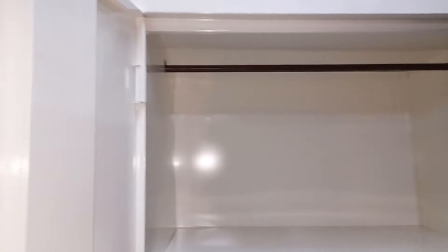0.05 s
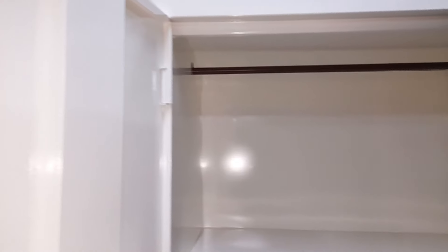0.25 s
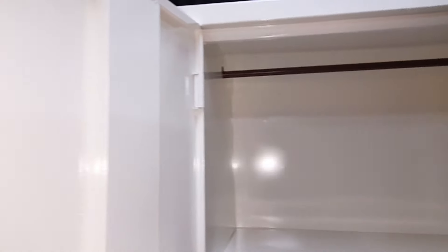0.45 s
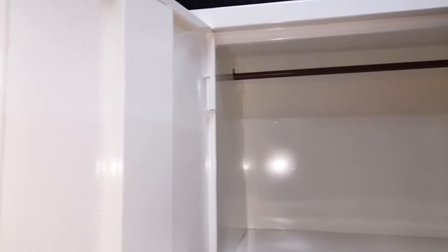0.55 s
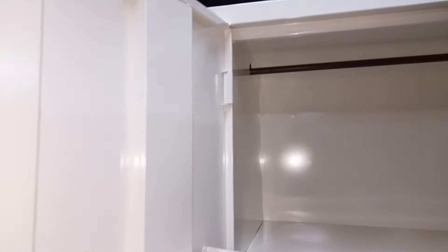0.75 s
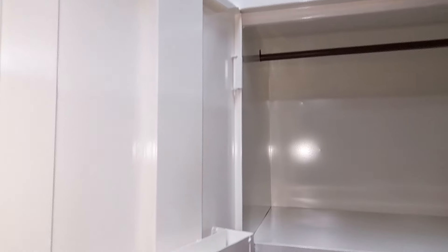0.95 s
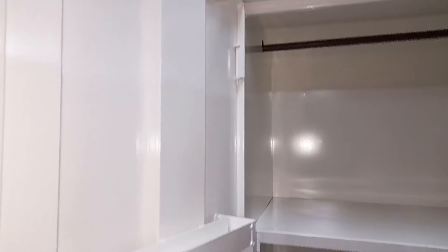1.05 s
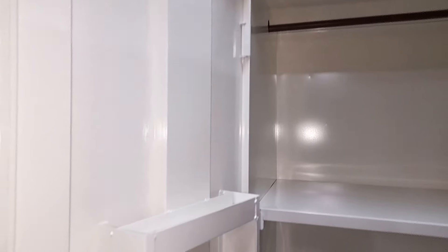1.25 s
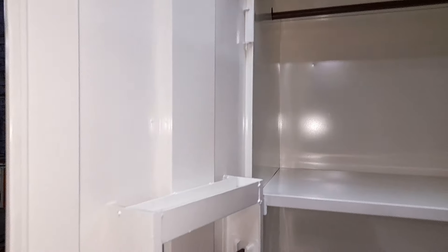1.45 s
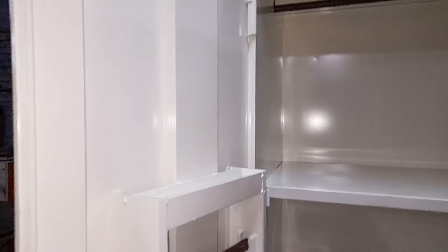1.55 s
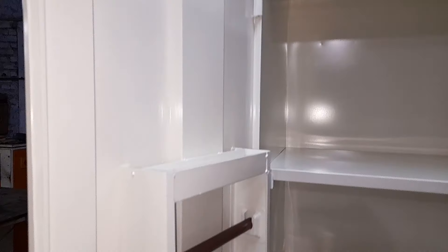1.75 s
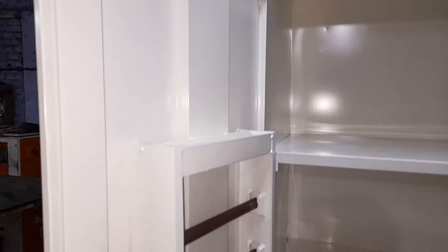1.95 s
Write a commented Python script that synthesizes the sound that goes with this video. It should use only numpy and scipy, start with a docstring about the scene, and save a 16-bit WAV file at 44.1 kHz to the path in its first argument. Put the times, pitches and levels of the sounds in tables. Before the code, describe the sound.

A steel wardrobe door knocks and clacks several times in a hard, echoing room.

```python
"""The door of a sheet-steel wardrobe knocks lightly, then clacks home, several times in a hard room.
Each impact excites the steel's dense modes and the door's strong ones, and reverberation prolongs them.
The large panels boom on between the blows, and a thud passes through the floor. An edge slides briefly
after the first clack, and the last clack sets a small steel part ringing."""
import sys
import numpy as np
from scipy import signal
from scipy.fft import rfft, irfft
from scipy.io import wavfile

SR = 44100
rng = np.random.default_rng(int(sys.argv[2]) if len(sys.argv) > 2 else 0)


def generate_wav(signal):
    """Clip the signal to [-1, 1] and save it as 16-bit WAV at the path in sys.argv[1]."""
    frames = np.transpose(np.atleast_2d(signal))
    scaled = np.clip(frames, -1, 1) * 32767
    pcm = np.round(scaled).astype(np.int16)
    wavfile.write(sys.argv[1], SR, pcm)


N = 88200

# Likeness of the two channels. Each row: frequency in Hz, correlation (limited to 1 in use).
CORRELATION = [(100, 1.1), (250, 0.77), (500, 0.83), (1000, -0.04), (2000, -0.08), (5000, 0)]


def amp(db):
    """Amplitude ratio of a level in decibels."""
    return 10 ** (np.asarray(db) / 20)


def curve_at(points, hz):
    """A curve's value at hz, interpolated on a logarithmic frequency axis."""
    f, value = np.transpose(points)
    return np.interp(np.log(hz + 1), np.log(f + 1), value)


def add(mix, start_s, sound):
    """Superposition: a sound adds to the mix from start_s on."""
    at = round(start_s * SR)
    sound = sound[:, max(-at, 0):]
    part = mix[:, max(at, 0):][:, :sound.shape[1]]
    part += sound[:, :part.shape[1]]


def noise(colour, size, shade_db=0):
    """Partial coherence: coloured stereo noise of unit level, then shaded; alike only in the bass."""
    hz = np.fft.rfftfreq(size, 1 / SR)
    a, b, c, d = rng.standard_normal((4, len(hz)))
    correlation = np.clip(curve_at(CORRELATION, hz), -1, 1)
    gain = amp(curve_at(colour, hz))
    mid = (a + 1j * b) * np.sqrt(1 + correlation)
    side = (c + 1j * d) * np.sqrt(1 - correlation)
    spectrum = np.array([mid + side, mid - side]) * gain * amp(shade_db)
    return irfft(spectrum, size) * np.sqrt(size / np.mean(gain ** 2)) / 2


def ring(modes, rise_s, size, scatter=0):
    """Free vibration: damped modes build up and decay, each with its own phase between the channels."""
    t, out = np.arange(size) / SR, np.zeros((2, size))
    for hz, db, t60 in modes:
        correlation = np.clip(curve_at(CORRELATION, hz), -1, 1)
        apart = np.arccos(correlation) * rng.choice([-1, 1]) / 2
        phase = 2 * np.pi * scatter * rng.random() + np.array([[apart], [-apart]])
        out += amp(db) * np.exp(-np.log(1000) * t / t60) * np.sin(2 * np.pi * hz * t + phase)
    return out * (1 - np.exp(-t / rise_s))


def room_air(start_db=-51, rise_db=8, rise_s=0.21):
    """Ambient noise: a low rumble and hiss, which grow as the moving door adds faint rubbing."""
    # Noise spectrum. Each row: frequency in Hz, relative density in dB.
    spectrum = [(20, -22), (100, 11), (250, -4.5), (500, -7), (1000, -15), (3000, -26.5), (4800, -28.5),
                (5800, -17), (7000, -34), (14000, -30)]
    growth = np.minimum(np.arange(N) / SR / rise_s, 1)
    return amp(start_db + rise_db * growth) * noise(spectrum, N)


def sliding_edge(peak_db=-42.5, start_s=0.35, peak_s=0.42, end_s=1):
    """Sliding friction: a painted edge rubs along the steel with a hiss that swells and fades."""
    # Friction spectrum. Each row: frequency in Hz, relative density in dB.
    spectrum = [(100, -15), (700, 7), (2000, 2), (5500, -2.5), (9000, -6), (13000, -1.5), (16000, -4.5)]
    swell = np.interp(np.arange(N) / SR, [start_s, peak_s, end_s], [0, 1, 0])
    return amp(peak_db) * swell * noise(spectrum, N)


def steel_part():
    """Modal ringing: a small, stiff part has high natural frequencies, so it pings thinly when struck."""
    # Its modes. Each row: frequency in Hz, relative level in dB, T60 in seconds.
    modes = [(11820, -10, .28), (12745, 0, .25), (13610, -4, .38), (14250, -13, .3), (14560, -6, .55),
             (15075, -14, .28), (15510, -7, .48)]
    # Blows on it. Each row: start in seconds, gain in dB.
    hits = [(1.129, -59), (1.53, -25.5)]
    out = np.zeros((2, N))
    ping = ring(modes, rise_s=0.00064, size=SR, scatter=1)
    for start_s, db in hits:
        add(out, start_s, amp(db) * ping)
    return out


def panels(thud_hz=53.6, thud_peak_s=0.03):
    """Flexural vibration: shoves set the large panels booming, while footsteps send low thuds through the
    floor."""
    # Bending modes. Each row: frequency in Hz, relative level in dB, T60 in seconds.
    modes = [(62.5, -13, 3.7), (80.2, -5.5, 1.1), (98.2, -7, 0.89), (104.77, 2.5, 1.37), (120.9, 1, 1.17),
             (134.7, -9.5, 1.4), (173.7, -14, 1.1)]
    # Heavy shoves and footfalls. Each row: start in seconds, boom gain in dB, thud gain in dB.
    shoves = [(-.12, -43.5, -65), (.225, -55, -54), (.295, -36, -33.5), (0.426, -34.5, -38),
              (0.604, -27, -48.5), (0.673, -26, -36), (.87, -32.5, -49.5), (1.099, -33.5, -36),
              (1.241, -36.5, -49), (1.39, -39, -43), (1.536, -26, -52), (1.60, -33, -35), (1.681, -40, -43),
              (1.80, -34, -50)]
    out, t = np.zeros((2, N)), np.arange(N) / SR
    boom = ring(modes, rise_s=0.015, size=N).mean(axis=0, keepdims=True)
    pulse = (t / thud_peak_s * np.exp(1 - t / thud_peak_s)) ** 2
    thud = pulse * np.sin(2 * np.pi * thud_hz * t)
    for start_s, boom_db, thud_db in shoves:
        add(out, start_s, amp(boom_db) * boom + amp(thud_db) * thud)
    return out


def door_bumps():
    """Damped resonance: a light bump before a clack excites only a few modes, a short hollow note."""
    # Modes of the note. Each row: frequency in Hz, relative level in dB, T60 in seconds.
    modes = [(685.7, 0.5, 0.39), (740, 2, 0.14), (825, -40, 0.098)]
    # Light contacts. Each row: start in seconds, gain in dB.
    bumps = [(.183, -33.5), (.204, -25), (.572, -25), (1.112, -33), (1.482, -27)]
    out = np.zeros((2, N))
    note = ring(modes, rise_s=0.0027, size=SR)
    for start_s, db in bumps:
        add(out, start_s, amp(db) * note)
    return out


def impact_decay(size, frame, hold_s=0.014, crack_s=0.0029):
    """Damping and reverberation: steel and room decays add in power, a gain by frequency and time."""
    # Quick decay of the steel. Each row: frequency in Hz, T60 in seconds.
    steel_t60 = [(200, 0.87), (800, 0.47), (2000, 0.6078), (5000, 0.02), (13000, 0.0954)]
    # Slow decay of the room. Each row: frequency in Hz, T60 in seconds.
    room_t60 = [(100, 2.2), (400, 1.01), (900, 0.99), (1800, 0.94), (3000, 1.05), (5000, 0.61),
                (13000, 0.32)]
    # Reverberant strength. Each row: frequency in Hz, level relative to the steel in dB.
    room_db = [(200, -7.5), (800, -6), (1800, -11.5), (3000, -14), (5000, -12.5), (13000, -12)]
    # The crack of the first instants. Each row: frequency in Hz, initial boost in dB.
    crack_db = [(300, 1), (900, 0.5), (2000, 2.5), (5000, 1), (13000, 3)]
    hz, t, _ = signal.stft(np.zeros(size), SR, nperseg=frame)
    hz = hz[:, None]
    fall = -np.log(1000) * np.maximum(t - hold_s, 0)  # early echoes hold the level at first
    steel = np.exp(fall / curve_at(steel_t60, hz))
    room = amp(curve_at(room_db, hz)) * np.exp(fall / curve_at(room_t60, hz))
    crack = amp(curve_at(crack_db, hz) * np.exp(-t / crack_s))
    return np.hypot(steel, room) * crack


def door_knocks():
    """Impact excitation: each blow wakes the steel's modes, dense as noise, and the door's strong ones."""
    # Blows. Each row: start in seconds, gain in dB, relative levels of body, clack, tick and door ring
    # in dB, rise time constant in seconds, frequency favoured by the spot struck in Hz.
    blows = [(.181, -42, 9, 6, 1, -6, 0.012, 745), (.200, -38, 7, 7.5, 4, 4.5, 0.013, 710),
             (.232, -37, 1.5, 12.5, 4, -30, 0.015, 704), (.257, -25, -2.5, 4.5, -4.5, 1.5, 0.0015, 552),
             (.312, -33.5, 5.5, -32, -15, -23, 0.0011, 395), (.569, -25.5, 6, 4, -0.5, 4, 0.018, 783),
             (.611, -22, -4, 3, 3.5, -3.5, 0.00035, 865), (.617, -20, 5, 3, 0, 2.5, 0.00033, 376),
             (1.076, -40, 8, 3.5, -5, -15.5, 0.0091, 705), (1.111, -34.5, 2, 2.5, 3, 3.5, 0.0045, 750),
             (1.127, -37, -3.5, 7, 5, -27, 0.0054, 580), (1.193, -42.5, 1, 0, 3.5, 15.5, 0.00082, 595),
             (1.207, -35.5, 5, 4.5, -11, -6.5, 0.0013, 537), (1.243, -40, 3, -32, -18, 5, 0.0016, 556),
             (1.353, -53, -13, -9, -3, -11, .002, 550), (1.39, -39.5, 2, 0, -1.5, -7, 0.003, 540),
             (1.480, -32, 3, 7.5, 9, 6.5, 0.01, 724), (1.531, -21, 0.5, 2, 6.5, 0, 0.00021, 737),
             (1.553, -25, 0.5, 2.5, 6, -0.5, 0.0013, 559.5)]
    # Dense modes of the sheet steel. Each row: frequency in Hz, relative density in dB.
    sheet_spectrum = [(30, -32), (130, -3), (210, -8), (290, -3.5), (450, 0.5), (800, 1.5), (1000, -4),
                      (1400, -11), (2000, -13), (2700, -16), (4400, -8.5), (6300, -11.5), (10000, -19.5),
                      (13500, -11.5), (16000, -22.5)]
    # Strong modes of the door. Each row: frequency in Hz, relative level in dB, T60 in seconds.
    door_modes = [(242, -9, .65), (277, -1, .75), (329, -4, .8), (383, 1, .72), (484, -2, .65),
                  (538, -1, .85), (576, -5, .85), (658, -6, .55), (694, -3, .55), (768, -3, .52),
                  (825, -5, .57), (873, -3, .7), (1072, -10, .35), (4140, -10, .27), (4484, -10, .27)]
    # Uneven bunching of the dense modes. Each row: frequency in Hz, share of the ripple depth.
    ripple_share = [(700, .3), (2000, .55), (4000, 1)]
    ripple_db, ripple_step_hz = 4, 44.9
    focus_db, focus_octaves = 6.5, 0.091
    soft_db, soft_rise_s = -6.5, 0.0059  # slow, soft blows lose their upper clack
    door_gain_db, size, frame = -13, SR, 256
    out, t = np.zeros((2, N)), np.arange(size) / SR
    hz = np.fft.rfftfreq(size, 1 / SR)
    bunching = np.interp(hz / ripple_step_hz, np.arange(len(hz)), rng.standard_normal(len(hz)))
    ripple = ripple_db * curve_at(ripple_share, hz) * bunching
    decay = impact_decay(size, frame)
    door_spectrum = rfft(ring(door_modes, rise_s=0.0027, size=size, scatter=0.98))
    for start_s, db, body_db, clack_db, tick_db, ring_db, rise_s, focus_hz in blows:
        snap_db = clack_db + soft_db * min(rise_s / soft_rise_s, 1)
        tone = [(400, body_db), (700, 0.0043), (900, 0),
                (1600, clack_db), (5500, snap_db), (11000, tick_db)]
        focus = np.exp(-(np.log2((hz + 1) / focus_hz) / focus_octaves) ** 2)
        shade_db = curve_at(tone, hz) + focus_db * focus
        dense_modes = noise(sheet_spectrum, size, ripple + shade_db)
        frames = signal.stft(dense_modes, nperseg=frame)[2]
        steel = signal.istft(frames * decay)[1][:, :size]
        door = irfft(door_spectrum * amp(shade_db), size) * np.linspace(1, 0, size)
        attack = 1 - np.exp(-t / rise_s)
        add(out, start_s, amp(db) * attack * (steel + amp(door_gain_db + ring_db) * door))
    return out


def scene():
    """Superposition: the wardrobe's sounds add to the room's air."""
    return door_knocks() + door_bumps() + panels() + steel_part() + sliding_edge() + room_air()


def record(dry):
    """Frequency response: the microphones favour the right, dip near 8 kHz and are band-limited."""
    # Treble dip. Each row: frequency in Hz, gain in dB.
    dip = [(6400, -1), (7000, -6.5), (7700, -22), (8700, -16.5), (10000, -12), (12000, -10), (13500, -9.5)]
    # Channel balance. Each row: frequency in Hz, left minus right in dB.
    balance = [(40, 0), (110, -3), (300, -2), (600, -0.7), (1200, -3.5), (4000, -6.5), (8000, -7),
               (13000, -9.5)]
    cutoff_hz = 15900
    hz = np.fft.rfftfreq(2 * N, 1 / SR)
    response = amp(curve_at(dip, hz) + np.array([[.5], [-.5]]) * curve_at(balance, hz))
    heard = irfft(rfft(dry, 2 * N) * response)[:, :N]
    lowpass = signal.firwin(401, cutoff_hz, window=("kaiser", 9), fs=SR)
    return signal.oaconvolve(heard, lowpass[None], "same")


dry = scene()
out = record(dry)
generate_wav(out)
```